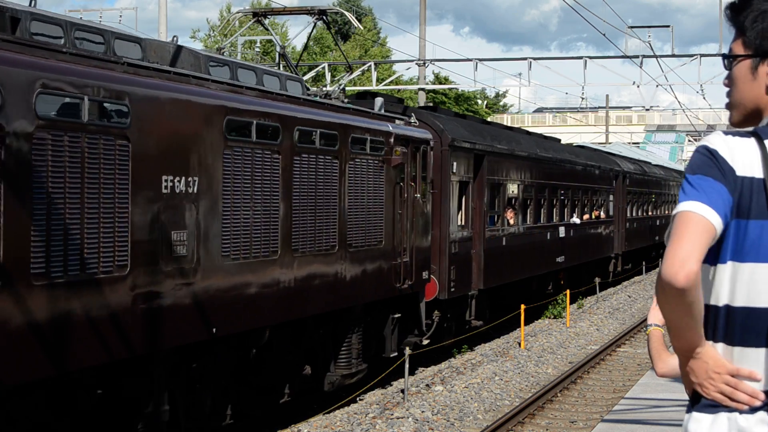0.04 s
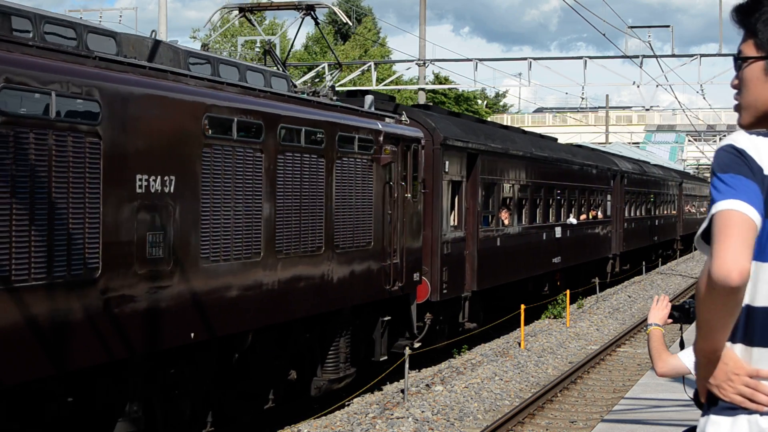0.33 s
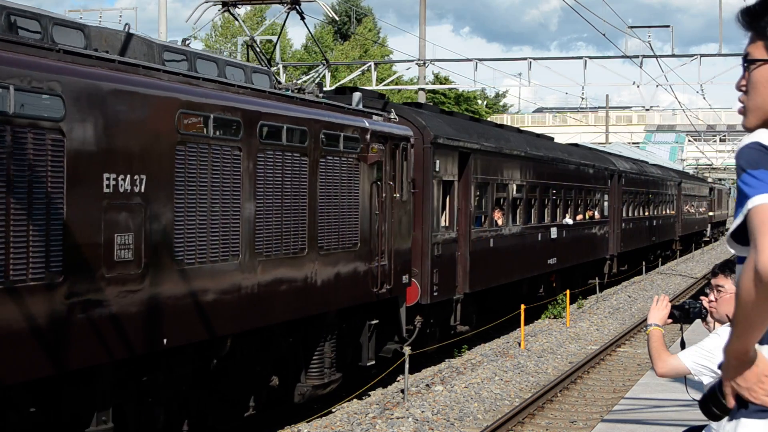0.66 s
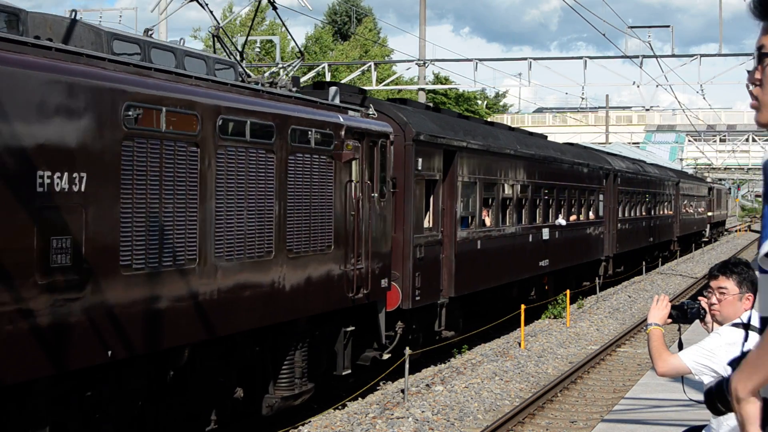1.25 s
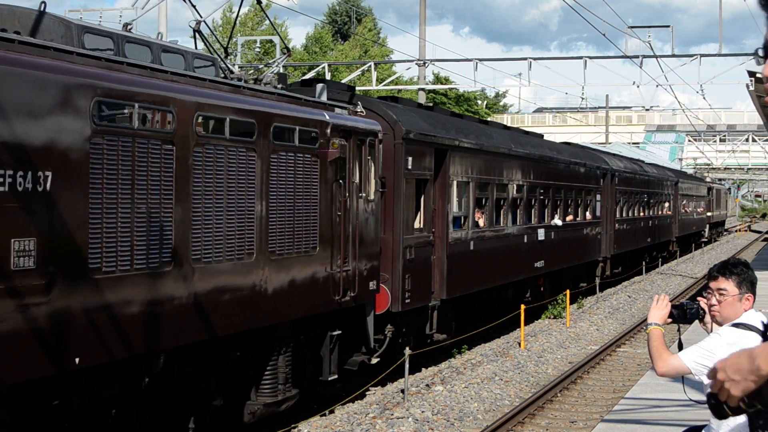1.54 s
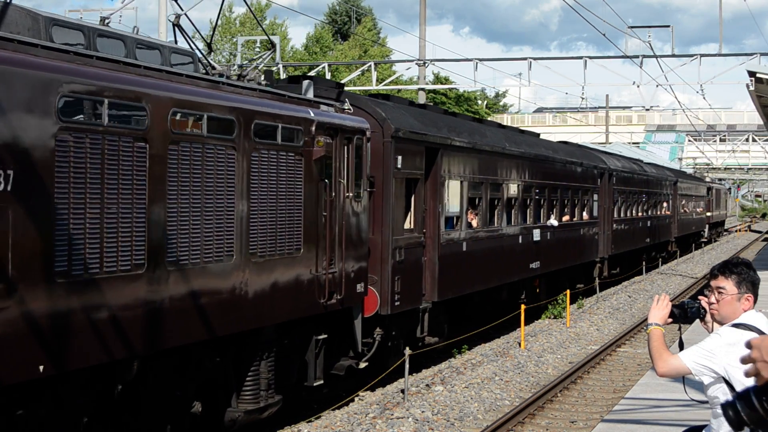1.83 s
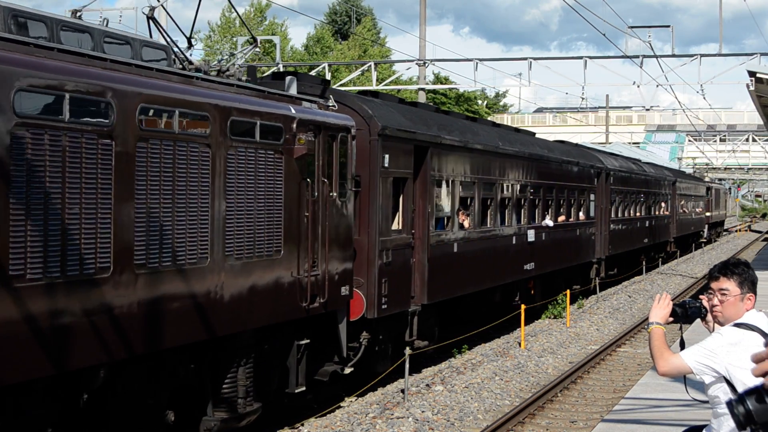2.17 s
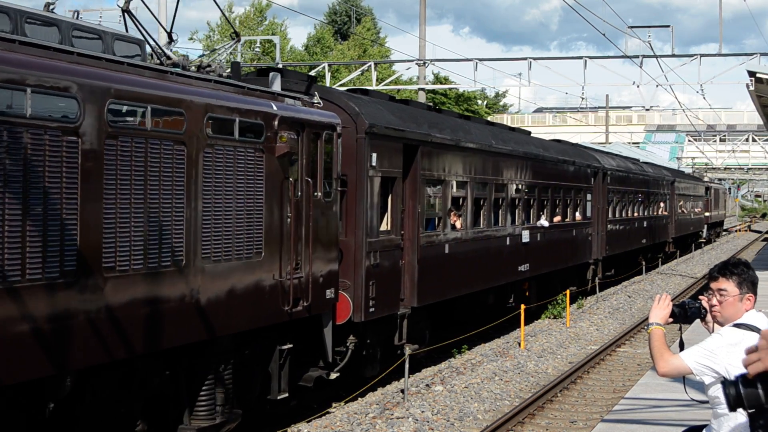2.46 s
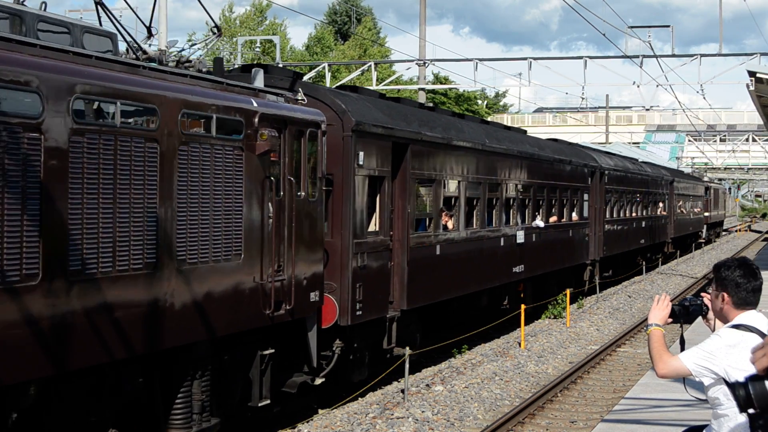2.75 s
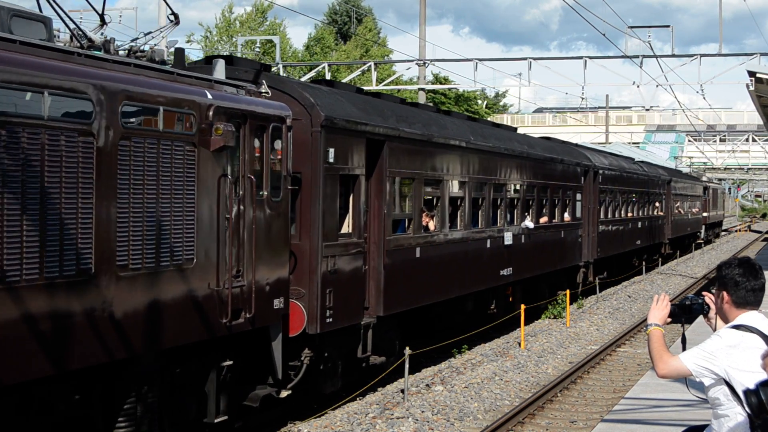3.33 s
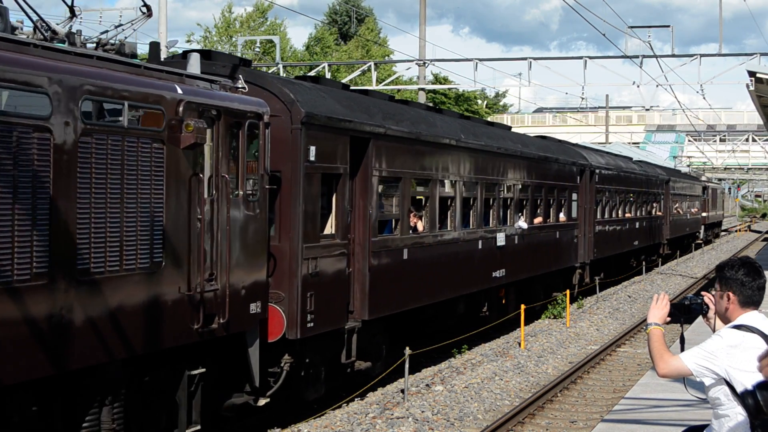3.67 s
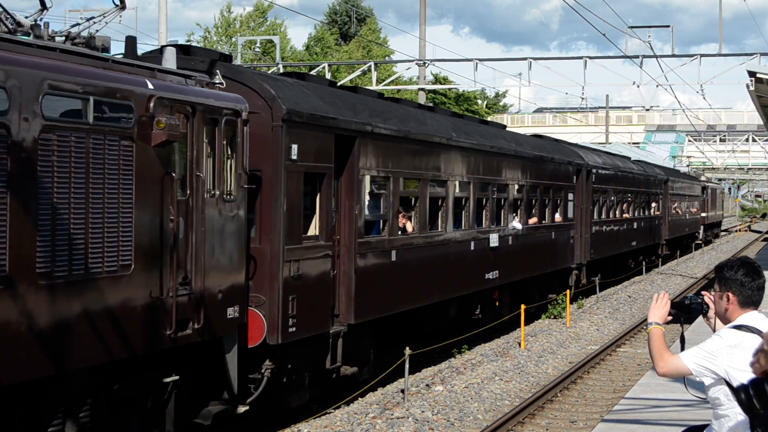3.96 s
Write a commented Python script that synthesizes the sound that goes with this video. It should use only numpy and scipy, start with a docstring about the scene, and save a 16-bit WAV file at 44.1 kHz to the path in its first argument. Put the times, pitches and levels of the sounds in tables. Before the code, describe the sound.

An electric locomotive's cooling fans drone and roar as it rolls slowly past.

```python
"""A station platform, one microphone, as an electric locomotive rolls slowly by with its blowers running.
Five cooling fans at slightly different speeds beat against each other; their blade tones swell and fade
as the louvres pass. Air roars through the ducts over the rumble of the wheels, with one brief hiss and
a few faint ticks. A limiter holds the peaks."""
import sys
import numpy as np
from scipy.fft import rfft, irfft, next_fast_len
from scipy.io import wavfile
from scipy.ndimage import uniform_filter1d, minimum_filter1d, map_coordinates

SR = 44100
rng = np.random.default_rng(int(sys.argv[2]) if len(sys.argv) > 2 else 0)


def dump_mix(stems):
    """Bounce the given channels to the path in sys.argv[1] as a 16-bit WAV at rate SR."""
    frames = np.atleast_2d(stems).T  # one column per channel
    limited = np.clip(frames, -1, 1)  # hard clip at full scale
    pcm = np.round(limited * 32767).astype(np.int16)
    wavfile.write(sys.argv[1], SR, pcm)


N = 176400

# one per fan: (blade-passing rate [Hz])
BLADE_HZ = [270.1, 286.0, 301.1, 309.3, 316.5]
# one row per fan: (level [dB] of each blade harmonic, 1 to 9)
HARMONICS_DB = [
    [-27.5, -29.5, -25, -37, -32.5, -47.5, -44.5, -63, -62],
    [-33, -29.5, -28.5, -43, -44.5, -59, -58.5, -63.5, -61],
    [-26.5, -34.5, -31, -34.5, -41, -42, -45, -52.5, -62.5],
    [-25, -23, -27, -35.5, -27.5, -40, -50, -56.5, -48.5],
    [-29.5, -26, -32, -36, -36.5, -38, -55, -54.5, -60.5],
]
# each harmonic's beam sweeping the microphone: (peak time [s], half width [s], swell [dB])
LOUVRE_BEAMS = [(3.2, 1.8, 6.5), (3.8, 1.5, 6), (2.06, 0.88, 7.5), (4, 2.4, 4), (1.6, 1.4, 1.5),
                (2.55, 2.9, 12.5), (3.5, 1.3, 1), (6.8, 1, 5), (2.9, 1.3, 5)]
# six prominent blade tones rise and fall on their own: (time [s], level [dB] about HARMONICS_DB)
HUM = [(0, 2.5), (.5, -8), (.9, -1), (1.5, -8.5), (2.2, -20.5), (2.9, -5.5), (3.3, 7), (3.7, 1), (4, 7)]
DRONE = [(0, -3), (.2, 6), (.5, -18.5), (1.08, 5.5), (1.4, 0.5), (1.8, 6.5), (2.05, 7.5), (2.35, 7),
         (2.8, 2), (3.1, 1), (3.5, 1.5), (3.75, 7), (4, 4)]
WHINE = [(0, 0), (.25, 2), (.5, 1.5), (1.0, 3.5), (1.3, -10), (1.65, 1), (2.0, -0.5), (2.22, 4.5),
         (2.45, 6), (2.68, -5), (2.8, 5), (2.97, 3), (3.2, -4), (4, -2)]
SECOND_DRONE = [(0, 10.5), (.3, -7), (.9, 3), (1.25, 6), (1.47, 2.5), (1.67, 4.5), (1.92, 2.5), (2.2, 8),
                (2.7, -5.5), (3.2, -8), (3.7, -16), (4, -4.5)]
LOW_WHISTLE = [(0, -5), (.6, 0.5), (1.25, -8), (1.8, 1), (2.15, -2), (2.6, 1.5), (3.05, 2.5), (3.4, -13.5),
               (4, -5.5)]
HIGH_WHISTLE = [(0, -14), (.7, 3), (1.1, -5.5), (1.5, 3), (2.2, -4), (2.55, 4.5), (2.95, 2), (3.27, 6.5),
                (3.6, 5.5), (4, -1)]
# which tone follows which curve: (fan from 0, harmonic from 1) -> curve
OWN_SWELLS = {(3, 1): HUM, (3, 2): DRONE, (3, 3): HIGH_WHISTLE, (3, 5): WHINE, (4, 2): SECOND_DRONE, (0, 3): LOW_WHISTLE}
# tones of the other machinery: (frequency [Hz], level [dB])
MACHINE_TONES = [(33.5, -54.5), (38.5, -54.5), (178, -48), (229, -44), (659, -33), (988, -47),
                 (9425, -84.5)]
# noise spectra: (frequency [Hz], relative level [dB])
AIR_SPECTRUM = [(100, -23), (250, -2), (370, -3.5), (480, -1), (720, 1), (830, 0), (1250, -4), (1500, -5),
                (1800, -9.5), (2300, -14.5), (3000, -21.5), (4000, -30.5), (5000, -40.5), (7000, -56.5),
                (12000, -87.5)]
HISS_SPECTRUM = [(1500, -26), (4000, 3), (6000, -0.5), (7500, -2.5), (9300, -4.5), (11000, -9.5),
                 (12000, -12.5), (14000, -24), (15700, -30)]
RUMBLE_SPECTRUM = [(12, -52.5), (24, -27), (34, -6), (48, -8.5), (65, -4), (110, -1.5), (190, -1.5),
                   (300, -7), (700, -31), (3000, -71.5)]
PUFF_SPECTRUM = [(2500, -15), (3700, -2), (4400, 7), (5600, -1), (7000, -13), (8600, -2.5), (9800, -10),
                 (11500, -14), (14000, -36)]
# duct resonances: (centre [Hz], half width [Hz], level [dB], peak time [s], swell [dB])
DUCT_RESONANCES = [(307, 36, -31, 3.5, 7.5), (619, 52, -22, 1.68, 6)]
# rushing air (before brightening) and wheel rumble at the microphone: (time [s], level [dB])
AIR_LEVEL = [(0, -20), (.5, -18.5), (1, -17), (1.5, -17), (2, -16), (2.5, -16), (3, -14.5), (3.5, -14.5),
             (4, -13.5)]
RUMBLE_LEVEL = [(0, -38), (.7, -33.5), (1.15, -37.5), (1.45, -32.5), (1.65, -34.5), (1.87, -28),
                (2.1, -34.5), (2.35, -31.5), (2.7, -33.5), (4, -32)]
# thin ticks: (time [s], relative level [dB])
TICKS = [(1.663, -47), (1.877, -49.5), (2.306, -53), (2.378, -50), (2.436, -49.5), (3.265, -56),
         (3.539, -47), (3.616, -46.5), (3.738, -54), (3.865, -55)]


def amp(db):
    """Decibels to gain."""
    return 10 ** (np.asarray(db) / 20)


def unit(x):
    """Scale to rms 1."""
    return x / np.sqrt(np.mean(np.abs(x) ** 2) + 1e-20)


def seconds():
    """The time of each sample."""
    return np.arange(N) / SR


def curve(rows):
    """(time [s], value) points joined by straight lines."""
    return np.interp(seconds(), *np.transpose(rows))


def wobble(rate):
    """A smooth random curve, rate knots a second."""
    coarse_s = seconds()[::64]
    knots = rng.standard_normal(1024)
    return np.interp(seconds(), coarse_s, map_coordinates(knots, [coarse_s * rate + 2], mode="wrap"))


def filtered(x, response):
    """Shape x by a gain that depends on frequency."""
    size = next_fast_len(N + SR // 2)
    return irfft(rfft(x, size) * response(np.fft.rfftfreq(size, 1 / SR)), size)[:N]


def noise(spectrum):
    """Noise of rms 1 coloured by (frequency [Hz], level [dB]) points."""
    points_hz, db = np.transpose(spectrum)
    white = rng.standard_normal(N)
    return unit(filtered(white, lambda hz: amp(np.interp(np.log(hz + 1), np.log(points_hz), db))))


def swell(peak_s, width_s, swell_db):
    """A gain of rms 1 that rises and falls as a beam of sound sweeps across the microphone."""
    return unit(amp(swell_db * np.exp(-((seconds() - peak_s) / width_s) ** 2)))


def tone(turns, reflected_share=.34, flutter_share=.22):
    """A sine of rms 1 that fades slowly among reflections and flutters in turbulent air."""
    reflections = reflected_share * (wobble(3.937) + 1j * wobble(3.937))
    flutter = flutter_share * (wobble(36) + 1j * wobble(36))
    direct = np.exp(2j * np.pi * (turns + rng.random()))
    return unit(np.real((1 + reflections + flutter) * direct))


def fans(pass_s=2.7, pass_width_s=1.1, wander_share=.00031):
    """Blade harmonics of every fan, sinking slightly in pitch as they pass the microphone."""
    doppler = 1 - .0013 * np.tanh((seconds() - pass_s) / pass_width_s)
    out = np.zeros(N)
    for fan, (blade_hz, levels) in enumerate(zip(BLADE_HZ, HARMONICS_DB)):
        turns = np.cumsum(blade_hz * (doppler + wander_share * wobble(2.014))) / SR
        for k, (db, beam) in enumerate(zip(levels, LOUVRE_BEAMS), 1):
            if (fan, k) in OWN_SWELLS:
                out += amp(db + curve(OWN_SWELLS[fan, k])) * tone(k * turns, reflected_share=.13)
            else:
                out += amp(db) * swell(*beam) * tone(k * turns)
    return out


def machinery():
    """Faint tones of steady pitch carry from inside the body."""
    return sum(amp(db) * tone(hz * seconds()) for hz, db in MACHINE_TONES)


def airflow(bright_hz=1800, brighten_db_per_s=1.07, hiss_db=-53, hiss_db_per_s=.45):
    """Cooling air roars out, louder and brighter as the louvres come to face the platform."""
    from_middle_s = seconds() - seconds().mean()
    air = noise(AIR_SPECTRUM)
    upper_mids = filtered(air, lambda hz: np.exp(-np.log2((hz + 1) / bright_hz) ** 2))
    brightening = (amp(brighten_db_per_s * from_middle_s) - 1) * upper_mids
    roar = amp(curve(AIR_LEVEL)) * (air + brightening)
    hiss = amp(hiss_db + hiss_db_per_s * from_middle_s) * noise(HISS_SPECTRUM)
    return roar + hiss


def ducts(swell_width_s=1.9):
    """Turbulence sounds the air ducts around the lowest two blade harmonics."""
    out = np.zeros(N)
    for centre_hz, width_hz, db, peak_s, swell_db in DUCT_RESONANCES:
        turbulence = rng.standard_normal(N)
        ring = unit(filtered(turbulence, lambda hz: 1 / (1 + ((hz - centre_hz) / width_hz) ** 2)))
        out += amp(db) * swell(peak_s, swell_width_s, swell_db) * ring
    return out


def wheels():
    """Low rolling rumble, strongest as a bogie goes by the microphone."""
    return amp(curve(RUMBLE_LEVEL)) * noise(RUMBLE_SPECTRUM)


def air_puff(peak_s=.9, width_s=.11, peak_db=-51.5):
    """A little air hisses briefly, faint under the blowers."""
    envelope = np.exp(-((seconds() - peak_s) / width_s) ** 2)
    return amp(peak_db) * envelope * noise(PUFF_SPECTRUM)


def ticks(low_cut_hz=6000, gain_db=10):
    """Faint single ticks with only treble in them."""
    times_s, db = np.transpose(TICKS)
    clicks = np.bincount(np.round(times_s * SR).astype(int), amp(db + gain_db), N)
    return filtered(clicks, lambda hz: hz ** 2 / (hz ** 2 + low_cut_hz ** 2))


def scene():
    """The locomotive as heard from the platform, in mono."""
    return (fans() + machinery() + airflow() + ducts() + wheels() + air_puff() + ticks())[None]


def record(dry):
    """A fast limiter catches the peaks; the microphone drops the deepest bass and the highest treble."""
    ceiling, hold_s, attack_s = .95, .004, .003
    low_cut_hz, top_hz = 26, 15700
    needed_gain = ceiling / np.maximum(np.abs(dry[0]), ceiling)
    held_gain = minimum_filter1d(needed_gain, int(hold_s * SR))
    limited = dry[0] * uniform_filter1d(held_gain, int(attack_s * SR))
    return filtered(limited, lambda hz: (hz < top_hz) * (1 - 1 / (1 + (hz / low_cut_hz) ** 6)))[None]


dry = scene()
out = record(dry)
dump_mix(out)
```